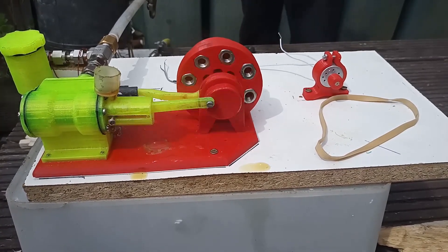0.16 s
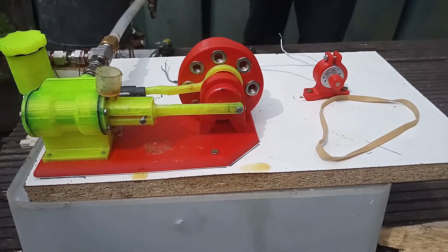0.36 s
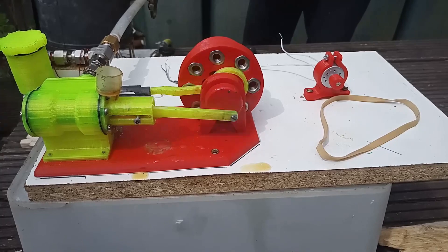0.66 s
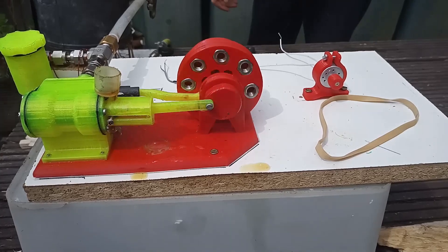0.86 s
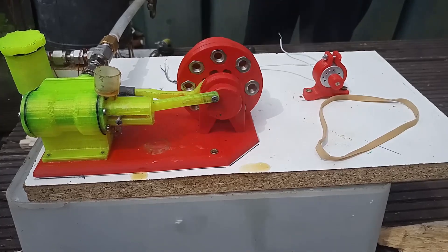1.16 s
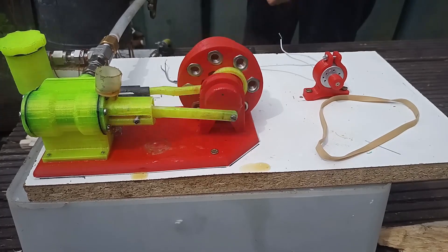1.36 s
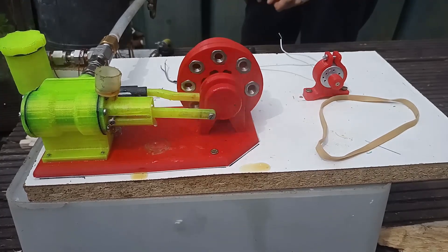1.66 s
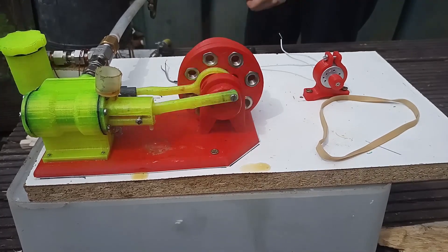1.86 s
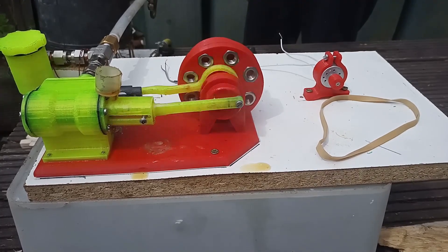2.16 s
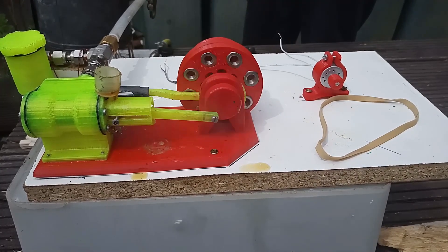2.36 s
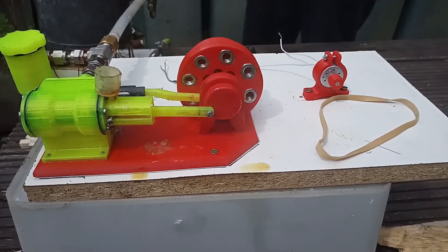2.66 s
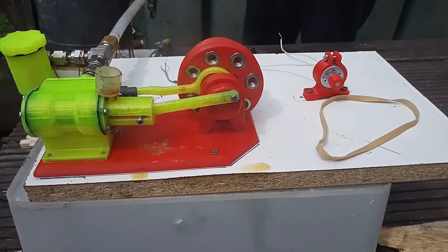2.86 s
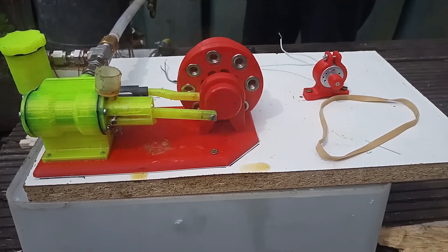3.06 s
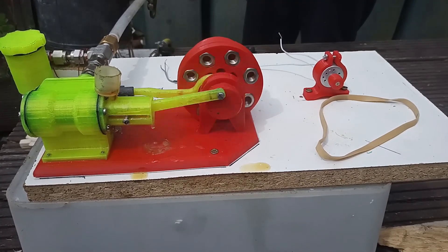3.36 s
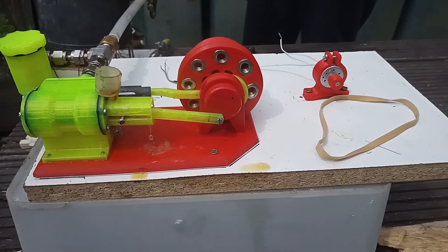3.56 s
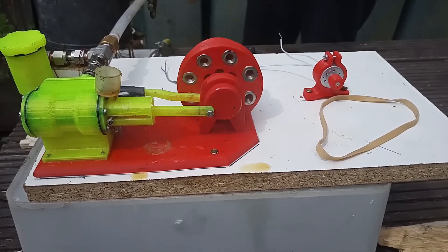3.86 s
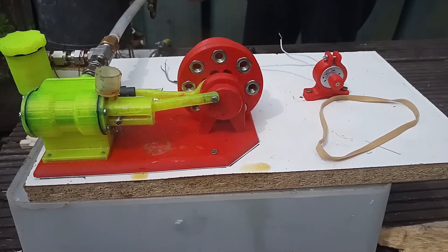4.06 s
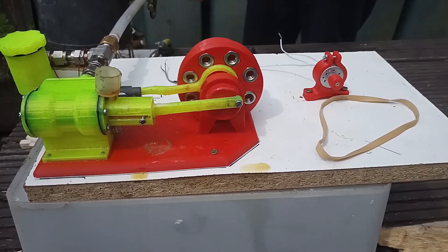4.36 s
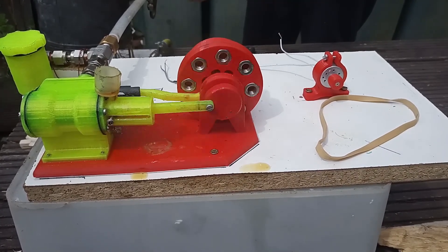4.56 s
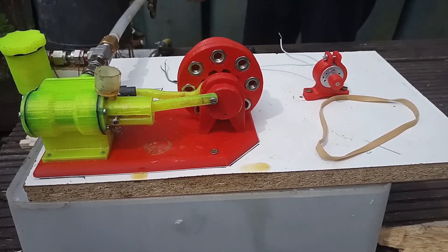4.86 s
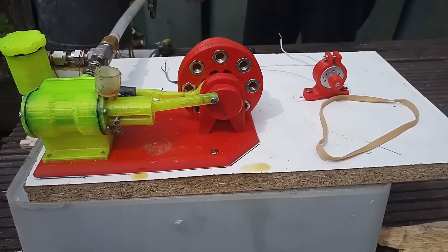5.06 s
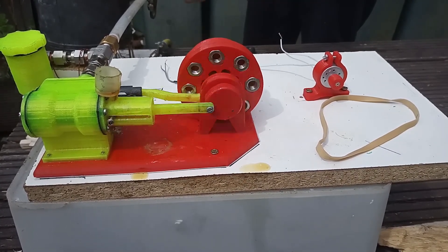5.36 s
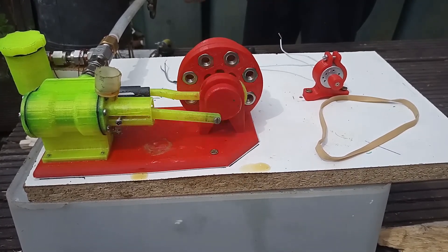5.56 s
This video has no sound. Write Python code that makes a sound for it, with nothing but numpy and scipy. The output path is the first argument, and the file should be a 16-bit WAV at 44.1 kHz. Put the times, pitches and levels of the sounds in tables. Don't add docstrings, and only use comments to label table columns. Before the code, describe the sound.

Quick bright exhaust puffs with light ticking and board rumble over a steady air leak; the engine slows, stops, then lurches through two turns.

```python
import sys
import numpy as np
from scipy import signal
from scipy.io import wavfile
from scipy.ndimage import uniform_filter1d

SR = 44100
rng = np.random.default_rng(int(sys.argv[2]) if len(sys.argv) > 2 else 0)


def persist_wave(psi):
    counts = np.round(np.clip(psi, -1, 1) * 32767).astype(np.int16)
    wavfile.write(sys.argv[1], SR, np.atleast_2d(counts).T)


def ratio_of_db(decibels):
    return 10 ** (np.asarray(decibels, float) / 20)


N = 252252


def rms_one(x):
    return x / np.sqrt(np.mean(x ** 2) + 1e-20)


def in_time(rows):
    s, *columns = np.transpose(rows)
    return [np.interp(np.arange(N) / SR, s, column) for column in columns]


def filtered(x, order, hz, kind):
    return signal.sosfilt(signal.butter(order, hz, kind, fs=SR, output="sos"), x)


def above(x, hz):
    return filtered(x, 10, hz, "high")


def drift(rate_hz):
    r = np.exp(-16 * np.pi * rate_hz / SR)
    white = rng.standard_normal(N // 8 + 4002)
    slow = signal.lfilter([1], [1, -2 * r, r * r], white)[4000:]
    return np.interp(np.arange(N) / 8, np.arange(len(slow)), rms_one(slow))


def resonate(x, modes, patchy_db=0., rate_hz=10.0, steep=False):
    out = 0
    for k, (hz, width_hz, level_db) in enumerate(modes):
        r = np.exp(-np.pi * width_hz / SR)
        b = (1 - r * r) / 2 * np.array([1, 0, -1])
        a = [1, -2 * r * np.cos(2 * np.pi * hz / SR), r * r]
        band = signal.lfilter(b, a, x)
        band = signal.lfilter(b, a, band) if steep else band * (-1) ** k
        out = out + ratio_of_db(level_db + patchy_db * drift(rate_hz)) * band
    return out


def hiss(modes, patchy_db, rate_hz, steep=False, apart=True):
    white = rng.standard_normal(N)
    if not apart:
        return rms_one(resonate(white, modes, patchy_db, rate_hz, steep))
    bands = [resonate(np.roll(white, shift=9001 * k), [mode], patchy_db, rate_hz, steep)
             for k, mode in enumerate(modes)]
    return rms_one(sum(bands))


def bursts(events, rise_s, fall_s):
    marks = np.full(N, 1e-18)
    marks[[round(row[0] * SR) for row in events]] = ratio_of_db(np.array(events)[:, 1])
    t = np.arange(round(.03 * SR)) / SR
    shape = (1 - np.exp(-t / rise_s)) * np.exp(-t / fall_s)
    return np.convolve(marks, shape)[:N] * rng.choice([-1, 1], N)


def hush():
    return ratio_of_db(-81) * hiss([(890, 1900, 0), (376, 310, 7)], patchy_db=4.0, rate_hz=2.8)


# (time [s], level [dB])
DRAUGHT = [(0.0, -45), (0.14, -52.5), (0.24, -69), (0.32, -55), (0.8, -54.5), (1.02, -74), (1.24, -74),
           (1.35, -53), (1.5, -51), (2.05, -57.5), (2.55, -63), (2.95, -58.5), (3.36, -62), (3.49, -58),
           (3.7, -72.5), (4.22, -62.5), (5.29, -61), (5.72, -52)]
# (time [s], peak [dB], frequency [Hz], length [s])
GUSTS = [(0.035, -39, 133, 0.014), (0.088, -35.5, 80, 0.011), (0.104, -38.5, 100, 0.053),
         (0.403, -42, 128, 0.0087), (0.438, -35.5, 122, 0.0063), (0.521, -41.5, 96.5, 0.013),
         (0.718, -41, 99, 0.013), (0.746, -47, 84, 0.041), (1.424, -36, 101, 0.013),
         (1.457, -39, 101, 0.007), (1.522, -45, 82.5, 0.045), (1.63, -48, 61, 0.0045),
         (1.694, -48, 109, 0.01), (1.777, -54, 81, 0.012), (1.816, -43, 112, 0.0053),
         (2.066, -36, 117, 0.0054), (2.092, -37, 90, 0.017), (2.82, -45, 94, 0.011),
         (3.124, -42, 104, 0.01), (3.485, -42.5, 90, 0.012), (4.391, -46.5, 77, 0.018),
         (4.612, -43.5, 100, 0.013), (4.641, -38.2, 91, 0.013), (5.019, -35.5, 84.4, 0.012),
         (5.107, -32, 103, 0.014), (5.158, -43, 90, 0.015), (5.197, -46, 80, 0.047),
         (5.419, -42.5, 75, 0.029), (5.5, -42.5, 75, 0.015)]


def draught():
    eddies = [(45.2, 22, -10), (58.4, 41, 4.0), (90, 32, -4.5), (131.3, 28.0, -2.0), (158, 80, -13)]
    low = hiss(eddies, patchy_db=6.5, rate_hz=12.4, steep=True)
    low = filtered(low, 6, 215, "low")
    low = filtered(low, 2, 38, "high")
    low /= uniform_filter1d(low ** 2, size=3000) ** 0.24 + 0.12
    out = ratio_of_db(in_time(DRAUGHT)[0] + 2.0) * rms_one(low)
    steps = np.arange(-2600, 2600)
    phases = rng.normal(0, 0.52, len(GUSTS))
    for (s, peak_db, hz, length_s), phase in zip(GUSTS, phases):
        swell = np.exp(-(2.04 * steps / SR / length_s) ** 2)
        bump = swell * np.cos(2 * np.pi * hz * steps / SR + phase)
        out[round(s * SR) + steps] -= ratio_of_db(peak_db + 1.5) * bump
    return out


# (time [s], fitting level [dB], seep past the valve [dB])
SUPPLY = [(0.0, -51, -67), (0.96, -51, -63.5), (1.35, -50, -70), (2.0, -52, -66), (3.1, -50.5, -65),
          (3.5, -50.5, -64), (4.2, -53, -71), (4.4, -53, -71), (4.68, -53.5, -68), (4.95, -53, -61.5),
          (5.26, -53, -61), (5.28, -53, -56), (5.45, -54.5, -61), (5.51, -52.5, -70), (5.72, -52.5, -71)]
# (frequency [Hz], width [Hz], level [dB])
LEAK = [(2666, 106, -7), (3265, 750, -6.5), (3932, 336, 2.5), (4360, 310, 2), (4940, 200, 0.5),
        (5810, 760, -6.5), (6480, 560, -15.5)]
# (frequency [Hz], width [Hz], level [dB])
SEEP = [(7600, 850, -26), (8650, 1300, 0), (9500, 1000, -5.5), (11400, 2000, -7), (13600, 1300, -14),
        (15100, 1500, -14)]
# (time [s], frequency [Hz], level [dB])
WHISTLE = [
    (4.93, 8650, -100),
    (4.965, 8600, -58),
    (5.0, 8550, -67),
    (5.06, 8150, -74),
    (5.1, 8060, -93),
]


def leak():
    fitting_db, seep_db = in_time(SUPPLY)
    steady = above(hiss(LEAK, patchy_db=1.2, rate_hz=12.), 2280)
    steady = filtered(steady, 10, 6750, "low")
    undertone = hiss([(1872, 170, 0), (1947, 47, 0.011)], patchy_db=2.5, rate_hz=11.0, steep=True)
    steady += ratio_of_db(-24.5) * above(undertone, 1700)
    seep = above(hiss(SEEP, patchy_db=-2.9, rate_hz=3.5), 5900)
    whistle_hz, whistle_db = in_time(WHISTLE)
    whistle = np.sin(2 * np.pi * np.cumsum(whistle_hz + 60. * drift(100.0)) / SR)
    whistle *= ratio_of_db(whistle_db + 3.4 * drift(40.))
    return ratio_of_db(fitting_db + 4.0) * steady + ratio_of_db(seep_db) * seep + whistle


# (time [s], strength [dB])
PUFFS = [(0.031, -40), (0.161, -38.5), (0.294, -41), (0.433, -41), (0.574, -37.5), (0.715, -38),
         (0.857, -37.5), (1.0, -37.5), (1.143, -35), (1.283, -35), (1.417, -37), (1.551, -38),
         (1.682, -41.5), (1.816, -41), (1.954, -39), (2.096, -38.5), (2.241, -36), (2.385, -38.5),
         (2.53, -39.5), (2.673, -37), (2.814, -37.5), (2.953, -37.5), (3.087, -37), (3.216, -36.5),
         (3.344, -37.5), (3.47, -38.5), (3.598, -39), (3.729, -41.5), (3.867, -41.5), (4.021, -42.5)]
# (opening time [s], strength [dB], open for [s])
HEAVES = [
    (4.198, -44, 0.13),
    (4.437, -41.5, 0.2),
    (5.3, -35.5, 0.144),
    (5.548, -38, 0.149),
]
OPEN_SHARE = 0.614


def turns():
    opens, strength_db = np.transpose(list(PUFFS) + [row[:2] for row in HEAVES])
    running = OPEN_SHARE * np.gradient(opens)[:len(PUFFS)]
    return opens, strength_db, np.append(running, [row[2] for row in HEAVES])


def stroke():
    opens, _, lasts = turns()
    t = np.arange(N) / SR
    turn = np.searchsorted(opens, t) - 1
    return np.where(turn < 0, 2, (t - opens[turn]) / lasts[turn]), turn


def valve_ticks():
    lead_share, tick_db, spread_db = 0.1306, -32.5, 1.5
    fade_db_per_s = 200.
    opens, _, lasts = turns()
    s = (opens - lead_share * lasts / OPEN_SHARE)[:len(PUFFS) + 1]
    slowness_s = np.maximum(lasts[:len(s)] - np.median(lasts), 0)
    return np.c_[s, tick_db - fade_db_per_s * slowness_s + spread_db * rng.standard_normal(len(s))]


# (time [s], level [dB])
MOTION = [(0.0, 7.5), (.05, 0.5), (3.76, 0.5), (3.9, -0.5), (4.27, -4), (4.35, -4), (4.4, -8), (4.47, -7.5),
          (4.64, -6.5), (4.69, -40), (5.24, -40), (5.27, -1), (5.32, -1), (5.46, 1.5), (5.52, -7),
          (5.57, -4), (5.66, 0), (5.72, -8)]
# (time [s], box boom [dB], panel rattle [dB])
ROCKING = [(0.0, 7, -1), (.1, 3, -6), (.33, -6.5, 0), (.5, 2.5, 0), (.75, -6, 1.5), (1.0, -4, 3),
           (1.5, 2, 3.5), (2.0, 1, 0.5), (2.15, -4.5, -5), (2.7, 0.5, -6.5), (2.85, 3.5, 3),
           (3.76, 0.5, -1.5), (4.25, -3.5, 0), (4.32, -12, -11), (5.3, -16, -16), (5.4, -2, -6),
           (5.5, -22, -14), (5.72, -7, 3)]
# (time [share of open time], board [dB], frame [dB], panel [dB], box [dB])
KNOCKS = [(.14, 1, 7, 3, -3), (.23, 1.5, 2, -3, 1.5), (.55, 0, 0.5, -1, 0), (.7, -4, 2, -0.5, 3),
          (.88, 4.5, -4.5, 7, 1), (1.0, 3, 3, 15, -2.5), (1.1, 12, 12, 4.5, 12), (1.32, -14, -6.5, 9.5, -2),
          (1.42, -2, 2, 7.5, -15)]
# (time [s], peak [dB])
JOLTS = [
    (5.276, -39),
    (5.53, -43),
]
# (frequency [Hz], width [Hz], level [dB])
BOARD = [(860, 95, 1.5), (957, 155, 6.5), (1160, 140, -4)]
FRAME = [(1598, 340, 4.1), (1826, 270, 1)]
GUIDE = [(1920, 420, 2.2), (2253, 320, -2), (2860, 1060, -2.5)]
PANEL = [(524, 51, -1.5), (590, 60, 0.1), (694, 180, -1)]
TICK = [(1510, 43, 8), (1880, 180, -3.5), (3460, 410, 1), (4600, 330, -4), (4970, 1700, -2),
        (6950, 840, -0.5), (9200, 610, -1.5), (12100, 1500, -15), (15000, 1500, -20)]


def piston_load(share, turn):
    loaded_until, eases_over = 0.88, 0.14
    load = uniform_filter1d(np.clip((loaded_until - share) / eases_over + 1, 0, 1), size=200)
    lasts = turns()[2]
    slowness = np.clip(lasts / np.median(lasts), 1, 1.7)[turn]
    return 1 - (1 - load) * slowness ** 0.89


def linkage(share, turn):
    motion_db, = in_time(MOTION)
    rocking_db, rattle_db = in_time(ROCKING)
    regular, = in_time([(3.9, 0.98), (4.1, 0.67)])
    at, *columns = np.transpose(KNOCKS)
    knocks = regular * np.exp(-((share - at[:, None]) / 0.048) ** 2)
    board_db, frame_db, panel_db, boom_db = np.array(columns) @ knocks
    load = piston_load(share, turn)

    board = hiss(BOARD, patchy_db=2.5, rate_hz=36.0, steep=True)
    board *= ratio_of_db(-61 + 1.07 * motion_db + board_db + 3.64 * load)
    frame_base_db = -61.5
    frame_db = frame_base_db + 0.95 * motion_db + frame_db
    frame = ratio_of_db(frame_db + 6.3 * load - 1.5) * hiss(FRAME, patchy_db=2.6, rate_hz=48.0, steep=True)
    guide = ratio_of_db(frame_db + 4.54 * load + 1.0) * hiss(GUIDE, patchy_db=1.9, rate_hz=33.0, steep=True)
    cylinder = hiss([(1165, 830, 0)], patchy_db=4.0, rate_hz=10.4, steep=True)
    cylinder *= ratio_of_db(frame_base_db + 1.4 * motion_db + 13.3 * load - 11.5)
    panel = hiss(PANEL, patchy_db=1.5, rate_hz=28.0, steep=True)
    panel *= ratio_of_db(-67 + 1.5 * motion_db + rattle_db + panel_db)
    box = [(202, 53, -5.5), (274, 95, 2.5), (325.3, 40, 0.0)]
    boom = hiss(box, patchy_db=3.0, rate_hz=21.0, steep=True)
    boom *= ratio_of_db(-63.5 + 0.88 * motion_db + rocking_db + boom_db + 3.2 * load)
    clicks = bursts(np.r_[valve_ticks(), JOLTS], rise_s=0.0018, fall_s=0.0015)
    ticks = ratio_of_db(12.0) * resonate(clicks, TICK, patchy_db=-0.5)
    return board + frame + guide + cylinder + panel + boom + ticks


def staged(share, stages):
    return uniform_filter1d(np.interp(share, *np.transpose(stages)), size=90)


# (frequency [Hz], width [Hz], level [dB])
SLIT = [(4500, 1470, -4.5), (5330, 510, 3.5), (6344, 520, 1.5), (8600, 760, 0.5), (9340, 840, 1),
        (10070, 950, -3), (13200, 1300, -37)]
JET = [(10100, 540, -7), (9420, 1000, -8), (10600, 1040, -1), (12300, 840, -0.5), (13060, 300, -3.5),
       (13370, 390, 0), (14300, 360, -24), (15600, 620, -2.5), (15300, 350, -25)]
PIPE = [(3970, 1640, -15), (4716, 260, 2.5), (4990, 284, 1.5), (5550, 660, -4.5), (6500, 270, -4.5),
        (7120, 700, -14), (7500, 180, -42)]
# (time [share of open time], level [dB])
SLIT_STAGES = [(0, -37), (0.039, 2.5), (.1, -0.5), (.55, -8), (.88, -6.5), (.95, 2), (1.02, -8.5),
               (1.35, -34)]
JET_STAGES = [(0, -48), (.04, -4), (.09, -23), (.14, 1.5), (.46, 0.5), (.55, -3), (.95, -10.5), (1.02, -21),
              (1.3, -52)]
PIPE_STAGES = [(0, -30), (.05, -12.5), (.5, -5), (.65, 0), (.88, -1.5), (1.0, -26.5), (1.2, -44)]
# (time [s], peak [dB])
SPITS = [(0.3672, -24), (0.4414, -24), (0.4909, -24), (0.6297, -25), (0.6502, -22), (1.0579, -26),
         (1.1982, -28), (1.2167, -32), (1.3206, -41), (1.5579, -21.5), (1.6096, -21), (1.8904, -22),
         (2.301, -32), (2.3254, -27), (2.593, -21), (2.6979, -24), (2.8343, -25), (2.8945, -23),
         (2.9678, -25), (3.2621, -18), (3.3935, -38), (3.4903, -23), (3.7798, -23), (4.6077, -21),
         (5.3613, -28), (5.4194, -20), (5.4315, -22)]
# (time [s], peak [dB])
SNAPS = [(1.0045, -31), (1.2275, -20.5), (1.361, -28), (2.3255, -29.5), (2.2425, -33)]


def oil_drops():
    opens, _, lasts = turns()
    small_s = opens + lasts * rng.random(len(opens))
    small_db = -33 + 3.0 * rng.standard_normal(len(opens))
    drops = bursts(np.r_[SPITS, np.c_[small_s, small_db]], rise_s=.0006, fall_s=.001)
    return ratio_of_db(13.) * resonate(drops, PIPE, patchy_db=.8)


def exhaust(share, turn):
    _, strength_db, lasts = turns()
    jet_db, follows, loss_db_per_s = -49.5, 0.34, 14
    swing_db = follows * (strength_db - strength_db.mean())
    level_db = (jet_db + swing_db - loss_db_per_s * (lasts - lasts.min()))[turn]
    slit = hiss(SLIT, patchy_db=0.0, rate_hz=37.0, apart=False)
    slit *= ratio_of_db(staged(share, SLIT_STAGES) + level_db + 6.0 + 1.9 * drift(120.))
    snaps = bursts(SNAPS, rise_s=0.00054, fall_s=0.0011)
    slit += ratio_of_db(10.0) * above(resonate(snaps, SLIT), 7000)
    jet = ratio_of_db(staged(share, JET_STAGES) + level_db + 2.5) * hiss(JET, patchy_db=1.8, rate_hz=37.0)
    flutter_db = 0.22 * drift(100.0) + 0.36 * drift(50.0)
    pipe = hiss(PIPE, patchy_db=0.0, rate_hz=62.0, apart=False)
    pipe *= ratio_of_db(staged(share, PIPE_STAGES) + strength_db[turn] + flutter_db - 1.0)
    return slit + jet + pipe + oil_drops()


def room(x):
    out = x.copy()
    for lag_s, echo_db in [(.0023, -30.5), (.0071, -23.5), (.013, -27.5), (.021, -18.5)]:
        lag = round(lag_s * SR)
        out[lag:] += ratio_of_db(echo_db) * x[:N - lag]
    return out


def scene():
    share, turn = stroke()
    engine = leak() + linkage(share, turn) + exhaust(share, turn)
    return (hush() + draught() + room(engine))[None]


def top_cut(x):
    return signal.sosfilt(signal.butter(12, 15900, fs=SR, output="sos"), x)


def record(dry):
    cut = signal.sosfilt(signal.ellip(12, .5, 70, 15850, fs=SR, output="sos"), dry)
    return top_cut(cut)


dry = scene()
out = record(dry)
persist_wave(out)
```